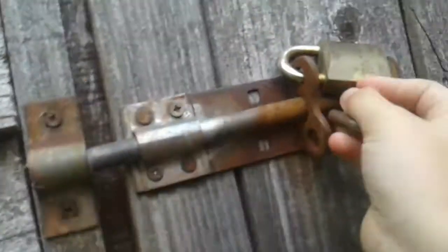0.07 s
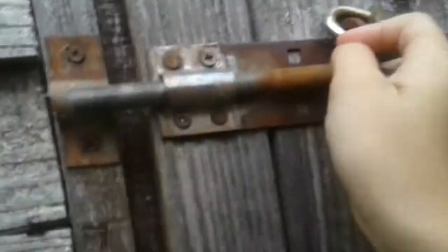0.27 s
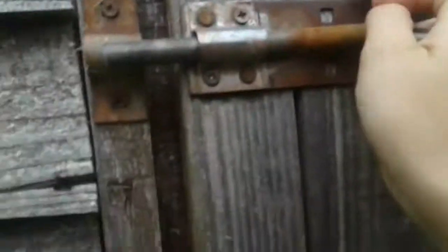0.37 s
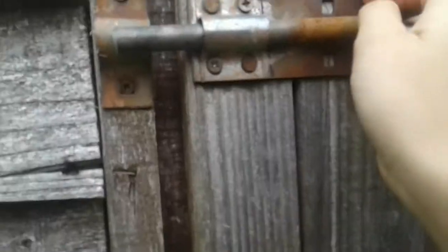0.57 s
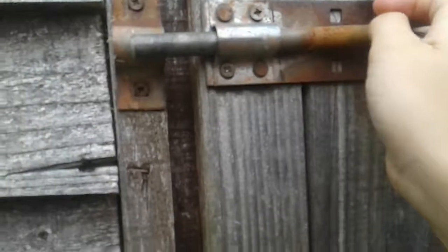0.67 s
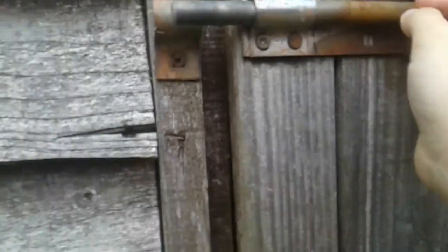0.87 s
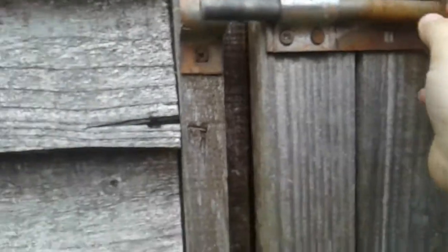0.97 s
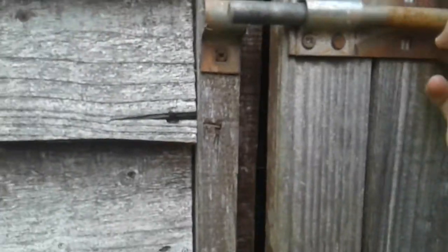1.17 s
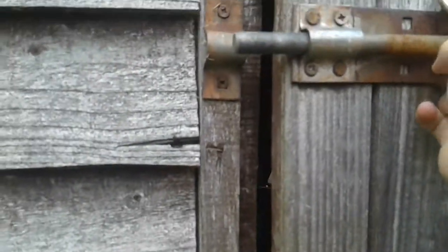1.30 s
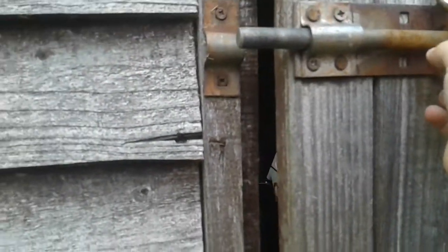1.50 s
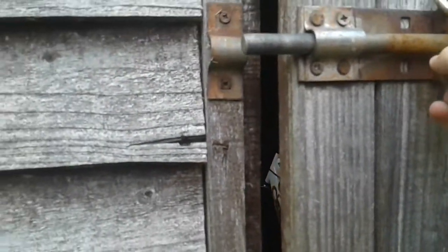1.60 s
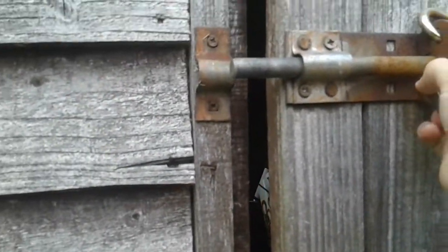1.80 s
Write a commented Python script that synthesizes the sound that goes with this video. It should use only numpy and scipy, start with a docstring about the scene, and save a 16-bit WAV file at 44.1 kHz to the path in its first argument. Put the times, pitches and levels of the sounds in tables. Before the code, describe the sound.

A rusty metal bolt clicks lightly, scrapes and slams home at about 0.3 seconds, the loudest moment, with a brief boom from the wooden shed door. Smaller padlock and bolt clicks follow. From 0.8 to 1.2 seconds the bolt is worked back in jerks, with faint squeaks and sharp clacks. Two more clacks come near 1.5 and 1.6 seconds. Everything is close, in quiet open air.

```python
"""A scrape, a sharp slam and a boom: a rusty steel bolt slides home on a wooden shed door.
Then it is worked back in jerks: it squeaks faintly and clacks against its keeper (the catch it
slides into), and the padlock clicks. Rust catching under the bolt makes the scrape, and metal
sticking and slipping makes the squeaks. Every blow is a short metallic crack and a knock of the
boards, heard close by in quiet open air."""
import sys
import numpy as np
from scipy import signal
from scipy.fft import rfft, irfft, next_fast_len
from scipy.io import wavfile

SR = 44100
rng = np.random.default_rng(int(sys.argv[2]) if len(sys.argv) > 2 else 0)


def master(y):
    """Save y as 16-bit WAV."""
    cut = np.clip(np.atleast_2d(y).T, -1, 1)
    pcm = np.round(cut * 32767)  # scale
    wavfile.write(sys.argv[1], SR, pcm.astype(np.int16))


N = 81585

# Levels in the tables are relative. A fade_s is the time a sound takes to fall by 60 dB.
BANDS_HZ = 1000 * 2 ** (np.arange(-16, 13) / 3)  # band centres, three to an octave
# tone colour of the steady air: band_hz, level_db
AIR_COLOUR = [(25, -11.5), (50, 7), (100, 4.5), (200, -3), (800, -5), (2000, -4.5), (8000, -13.5),
              (16000, -10)]
# tone colour of the faint background hiss: band_hz, level_db
HISS_COLOUR = [(1000, -10), (3000, -5.5), (5000, -5), (7000, 5.5), (9000, -9.5), (13000, 0.5), (16000, -8)]
# loudness of that hiss over time: time_s, level_db
HISS_LOUDNESS = [(0, -65.5), (.12, -60), (.2, -65.5), (.36, -61.5), (.45, -61.5), (.6, -65.5), (.82, -72),
                 (1.1, -63.5), (1.28, -64.5), (1.45, -76.5), (1.56, -72.5), (1.72, -68), (1.85, -73.5)]
# tone colour of the bolt scraping in its guides: band_hz, level_db
SCRAPE_COLOUR = [(25, -38), (70, -22), (170, -2.5), (350, -9), (560, 5), (900, -4), (1400, -7.5),
                 (2200, -10), (3700, -15), (5000, -17.5), (7000, -12.5), (9500, -28.5), (16000, -37.5)]
# loudness of the scrape over time: time_s, level_db
SCRAPE_LOUDNESS = [(0, -57), (.13, -56.5), (.19, -48.5), (.218, -32), (.234, -19.5), (.258, -28),
                   (.33, -33), (.41, -45), (.5, -49), (.56, -59.5), (.75, -61), (.88, -54.5), (.95, -50),
                   (1.13, -47.5), (1.27, -56.5), (1.42, -78), (1.55, -62.5), (1.85, -77)]
# blows of the bolt and padlock:
# start_s, level_db, bass_db, clank_db, treble_db, top_db, boards_db, ping_hz, ping_db
BLOWS = [(0.06, -36, 7.5, 1.5, -7.5, -23, -4.5, 1317, -6),
         (0.1516, -44.5, 10, -24, -10.5, -12, -2.5, 1270, -13),
         (0.2078, -37.5, 4, -5, 0, -5, -0.5, 1270, -0.5),
         (0.2425, -15.5, -10, -0.5, 0, 2, -0.5, 7300, -21.5),
         (0.2607, -7.5, -7, -6, 0.5, 1.5, -1.5, 2950, -21),
         (0.2784, -17, 9.5, 0.5, -5.5, -13, -7, 2358, -14.5),
         (0.3114, -24, 5, -7.5, -13.5, -16, -4, 2410, -28),
         (.438, -42.5, -13, -30, -22.5, -20.5, -2, 940, 1.5),
         (0.4649, -32.5, 10.5, 5, 6.5, -7, -7.5, 6700, -11),
         (0.6414, -32, -1.5, -6, -5.5, -11, -4, 1907, -9), (0.9101, -37, 0, -18, -15, -14, 0, 2100, -12),
         (0.9219, -29, -2, 6, 3.5, -5.5, -7, 4030, -24), (0.928, -31.5, 0.5, 0, -6, -5, 3, 2380, -4),
         (1.0414, -26.5, -7, 6.5, 5, -0.5, 1, 2080, -12),
         (1.1709, -20.5, -1, -3, -0.5, -6, -4, 3700, -25.5), (1.1826, -30, -3, 3, -40, -14, -8, 2360, -15),
         (1.5116, -37, -6, 4.5, 0.5, -10, -1.5, 1803, -7.5), (1.5665, -49, 10, -11, -13, -8, -5, 2040, -12),
         (1.6445, -26.5, -1.5, -1, 0, -4.5, -3, 1805, -20.5)]
# the crack of a blow and its tail: band_hz, level_db, crack_fade_s, tail_db, tail_fade_s
CRACK_BANDS = [(30, -52.5, 0.11, -5, 0.6), (80, -36, .15, -6, 1), (181.2, -16.5, 0.11, -5, 0.7),
               (393.7, -12, 0.078, -2, 0.34), (660, -12.5, 0.077, -7, 0.19),
               (832.6, -0.5, 0.057, -12, 0.43), (1191, -14.5, 0.049, -6, .18), (1950, -7, 0.06, -16, 0.24),
               (3240, -16.5, 0.046, -15.5, 0.14), (5130, -21, 0.042, -13.5, 0.22),
               (6900, -15.5, 0.071, -17, 0.44), (8330, -32.5, .022, -13.5, 0.23),
               (11500, -26.5, 0.047, -20, .28), (15000, -40.5, .022, -14.5, .25)]
# ringing tones of the boards and bolt plate, one list each: pitch_hz, level_db, fade_s
BOARD_PITCH_HZ = [213, 284, 333, 378, 441, 543, 638, 729, 813, 868, 990, 1290, 1460, 1825, 2245, 2945, 5450]
BOARD_LEVEL_DB = [-20, -15.5, -18, -20.5, -18.5, -15, -15.5, -14, -8.5, -6.5, -13, -16, -16.5, -17.5, -22.5,
                  -23.5, -33.5]
BOARD_FADE_S = [.35, .26, .3, .26, .22, .24, .18, .14, .14, .15, .15, .09, .1, .07, .09, .1, .12]
# dull bumps of the hand and door: start_s, level_db, pitch_hz, fade_s
BUMPS = [(0.191, -38.5, 212, 0.07), (0.509, -48.5, 75, 0.61), (1.22, -54.5, 259.5, 0.27),
         (1.364, -59.5, 66, .12), (1.487, -58, 125.7, 0.3), (1.801, -60.5, 167, 0.048)]
# ringing tones of the whole door, one list each: pitch_hz, level_db, fade_s
DOOR_PITCH_HZ = [168, 212, 246, 333, 383, 584, 642, 918, 1029, 1245, 1455, 2302]
DOOR_LEVEL_DB = [2, -5.5, -8, -7.5, -9, -4.5, -5.5, -4.5, -3.5, -1, -5.5, -11]
DOOR_FADE_S = [.65, .3, .25, .22, .22, .22, .18, .13, .14, .1, .11, .1]
# ringing tones of the bolt's shaft: pitch_hz, level_db, fade_s
SHAFT_TONES = [(6445, -24, .062), (10650, -50, .06), (13250, -52, .07)]
# squeaks: start_s, length_s, from_hz, to_hz, base_tone_db, octave_up_db, two_octaves_up_db
SQUEAKS = [(.815, 0.073, 476, 443, -54, -58, -80), (.988, 0.059, 540, 520, -64, -46.5, -55),
           (1.045, .075, 542, 534, -41, -72, -66), (1.05, 0.062, 489.5, 506, -58, -40, -52),
           (1.115, 0.042, 505, 487, -63, -55, -55), (1.132, 0.054, 550, 537, -45.5, -68, -63)]

SLAM_S, SLAM_DB = .2615, -14  # when the bolt hits home, and how strongly the door booms


def gain(db):
    """Turn decibels into a number to multiply by."""
    return 10 ** (np.asarray(db) / 20)


def even_level(x):
    """Scale a sound to an average (rms) level of 1."""
    return x / np.sqrt(np.mean(x ** 2))


def even_energy(x):
    """Scale a fading sound to the energy of 16 ms at level 1."""
    return x * np.sqrt(.016 * SR / np.sum(x ** 2, axis=-1, keepdims=True))


def at_bands(table, column=1):
    """Read one column of a table at the band centres."""
    table = np.array(table, float)
    return np.interp(np.log(BANDS_HZ), np.log(table[:, 0]), table[:, column])


def loudness_curve(table):
    """Join (time_s, level_db) points into a gain for each sample."""
    return gain(np.interp(np.arange(N) / SR, *np.array(table).T))


def wander(rate_hz):
    """A smooth random drift, roughly 1 either side of zero."""
    return np.interp(np.arange(N) / SR * rate_hz, np.arange(2000), rng.standard_normal(2000))


def split_bands(x):
    """Split a sound into bands from low to high, each at level 1."""
    freq_hz = np.maximum(np.fft.rfftfreq(len(x), 1 / SR), 1)
    bands_away = 3 * np.log2(freq_hz / BANDS_HZ[:, None])
    bands = irfft(rfft(x) * np.sqrt(np.clip(1 - abs(bands_away), 0, 1)), len(x))
    return bands / bands.std(axis=1, keepdims=True)


def noise_bands():
    """Fresh noise, one row for each band."""
    return split_bands(rng.standard_normal(next_fast_len(N)))[:, :N]


def add(out, x, start_s):
    """Mix x into out, beginning at start_s."""
    i = int(start_s * SR)
    out[i:i + len(x)] += x[:N - i]


def fade(t, fade_s):
    """Die away, losing 60 dB every fade_s."""
    return np.exp(-np.log(1000) * t / fade_s)


def ring(tones, t):
    """A struck object rings with fading tones; neighbours start in opposite directions."""
    return sum((-1) ** k * gain(db) * even_energy(np.sin(2 * np.pi * hz * t) * fade(t, fade_s))
               for k, (hz, db, fade_s) in enumerate(tones))


def background_noise(air_db=-65):
    """Quiet, steady air, plus a separate faint hiss whose level rises and falls."""
    air = even_level(gain(at_bands(AIR_COLOUR)) @ noise_bands())
    hiss = even_level(gain(at_bands(HISS_COLOUR)) @ noise_bands())
    return air * gain(air_db) + hiss * loudness_curve(HISS_LOUDNESS)


def bolt_scrape(grains_per_s=2500, spread_db=2.5, grain_ring_s=0.0088, flicker_db=1.5):
    """Grains of rust catch and let go under the moving bolt, shaking its plate."""
    size, t = next_fast_len(N), np.arange(SR // 20) / SR
    grains = (rng.random(size) < grains_per_s / SR) * rng.standard_normal(size)
    grains *= gain(spread_db * np.minimum(rng.exponential(size=size), 3))  # a few catch harder
    plate_ring = rng.standard_normal(len(t)) * np.exp(-t / grain_ring_s)
    shaking = signal.fftconvolve(grains, plate_ring)[:size]
    scrape = even_level(gain(at_bands(SCRAPE_COLOUR)) @ split_bands(shaking)[:, :N])
    return scrape * loudness_curve(SCRAPE_LOUDNESS) * gain(flicker_db * wander(60))


def metal_blows(crack_db=-6, ping_fade_s=0.053):
    """Each blow cracks, knocks the boards and adds a ping set by where the steel touches."""
    out, t = np.zeros(N), np.arange(SR // 2) / SR
    rise = 1 - np.exp(-2 * t * BANDS_HZ[:, None])  # low bands start more slowly
    crack_fade_s, tail_db, tail_fade_s = (at_bands(CRACK_BANDS, c)[:, None] for c in (2, 3, 4))
    snap = even_energy(rise * fade(t, crack_fade_s))
    tail = gain(tail_db) * even_energy(rise * fade(t, tail_fade_s))
    shape = np.hypot(snap, tail)
    boards = ring(zip(BOARD_PITCH_HZ, BOARD_LEVEL_DB, BOARD_FADE_S), t)
    noise = noise_bands()  # stands for many tightly packed tones
    for blow, offset in zip(BLOWS, rng.integers(0, N - len(t), len(BLOWS))):
        start_s, level_db, bass_db, clank_db, treble_db, top_db, boards_db, ping_hz, ping_db = blow
        colour_db = at_bands([(250, bass_db), (700, 0), (1100, 0), (2100, clank_db), (5000, treble_db),
                              (7000, treble_db), (11000, top_db), (16000, 2 * top_db)])
        bursts = even_energy(noise[:, offset:offset + len(t)] * shape)
        crack = gain(at_bands(CRACK_BANDS) + colour_db + crack_db) @ bursts
        ping = ring([(ping_hz, ping_db, ping_fade_s)], t)
        add(out, gain(level_db) * (crack + gain(boards_db) * boards + ping), start_s)
    return out


def hand_bumps(rise_s=0.00214):
    """Soft, low knocks as the hand shifts the door on its hinges."""
    out, t = np.zeros(N), np.arange(SR // 3) / SR
    rise = 1 - np.exp(-t / rise_s)
    for start_s, level_db, pitch_hz, fade_s in BUMPS:
        add(out, ring([(pitch_hz, level_db, fade_s)], t) * rise, start_s)
    return out


def door_boom(rise_cycles=3.6, muffle_at_s=.525, muffle_ease_s=0.0048, muffle_db=-10.5):
    """The slam sets the whole door booming, until the hand muffles it by pulling the bolt again."""
    out, t = np.zeros(N), np.arange(N) / SR
    for pitch_hz, level_db, fade_s in zip(DOOR_PITCH_HZ, DOOR_LEVEL_DB, DOOR_FADE_S):
        rise = 1 - np.exp(-t * pitch_hz / rise_cycles)
        add(out, ring([(pitch_hz, SLAM_DB + level_db, fade_s)], t) * rise, SLAM_S)
    grip = .5 * (1 + np.tanh((t - muffle_at_s) / muffle_ease_s))  # goes from 0 to 1
    return out * gain(muffle_db * grip)


def shaft_ring():
    """Struck on its end at the slam, the steel shaft gives a brief, high ring."""
    out = np.zeros(N)
    add(out, ring(SHAFT_TONES, np.arange(SR // 4) / SR), SLAM_S)
    return out


def bolt_squeaks(pitch_wobble=.022, wobble_hz=252, flutter_db=3.5, flutter_hz=220):
    """Metal dragged on metal sticks and slips, making short, unsteady tones."""
    out = np.zeros(N)
    for start_s, length_s, from_hz, to_hz, *octaves_db in SQUEAKS:
        size = int(length_s * SR)
        progress = np.linspace(0, 1, size)
        glide_hz = from_hz + (to_hz - from_hz) * progress
        pitch_hz = glide_hz * (1 + pitch_wobble * wander(wobble_hz)[:size])
        phase = 2 * np.pi * np.cumsum(pitch_hz) / SR
        tone = sum(gain(db) * np.sin(2 ** octave * phase) for octave, db in enumerate(octaves_db))
        swell = 2 * np.sin(np.pi * progress)
        flutter = gain(flutter_db * wander(flutter_hz)[:size])
        add(out, tone * swell * flutter, start_s)
    return out


def scene():
    """Add all the sounds together in one channel."""
    knocks = metal_blows() + hand_bumps() + door_boom() + shaft_ring()
    return (knocks + bolt_scrape() + bolt_squeaks() + background_noise())[None]


def record(dry, top_hz=15900):
    """Round off the loudest peak and cut the very highest treble."""
    rounded = np.tanh(0.69 * dry) / 0.78
    return signal.sosfilt(signal.ellip(10, .2, 80, top_hz, fs=SR, output="sos"), rounded)


dry = scene()
out = record(dry)
master(out)
```